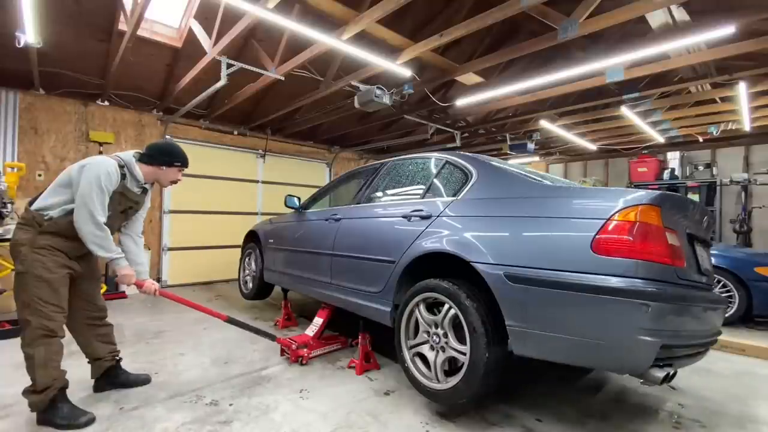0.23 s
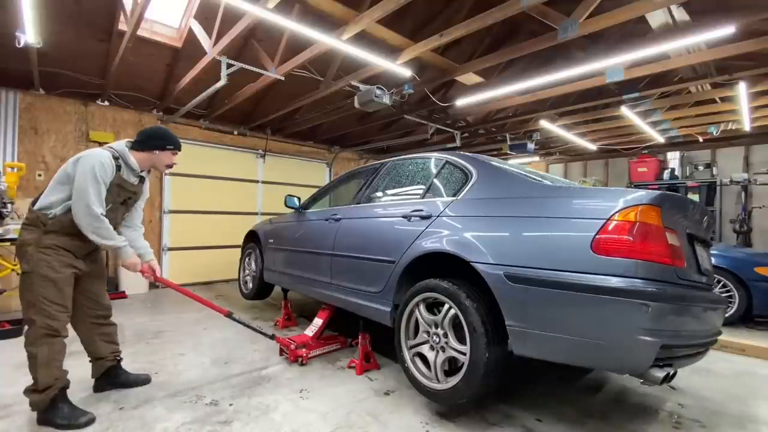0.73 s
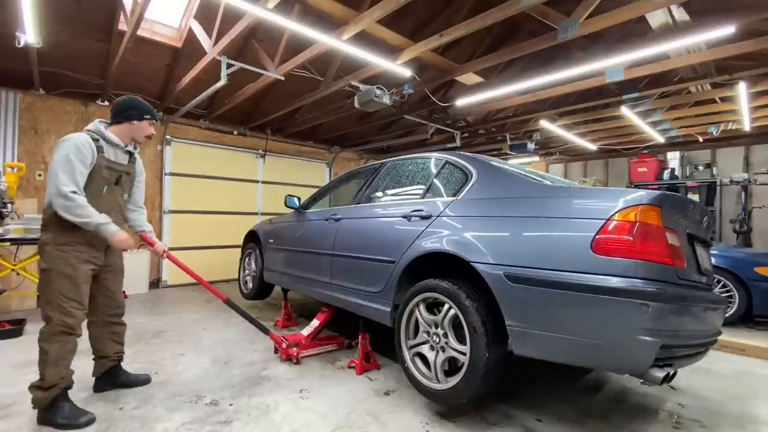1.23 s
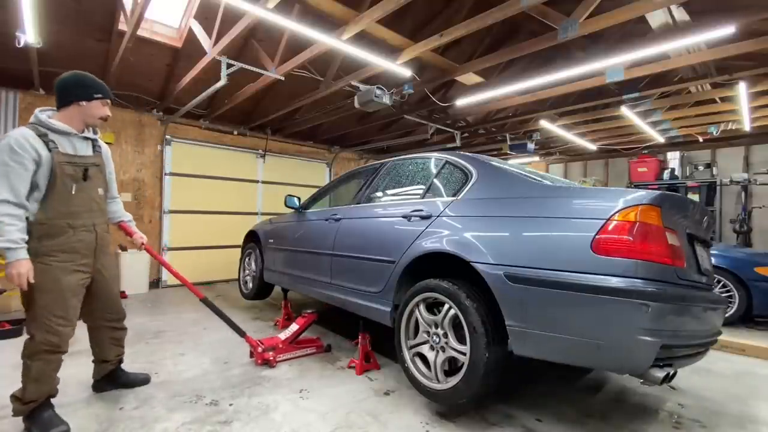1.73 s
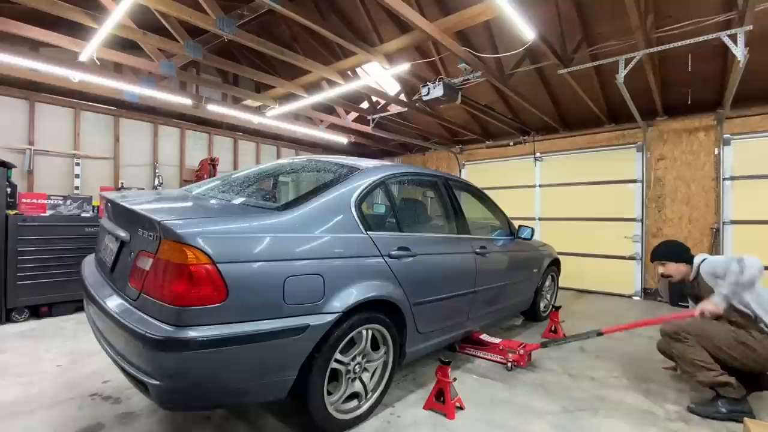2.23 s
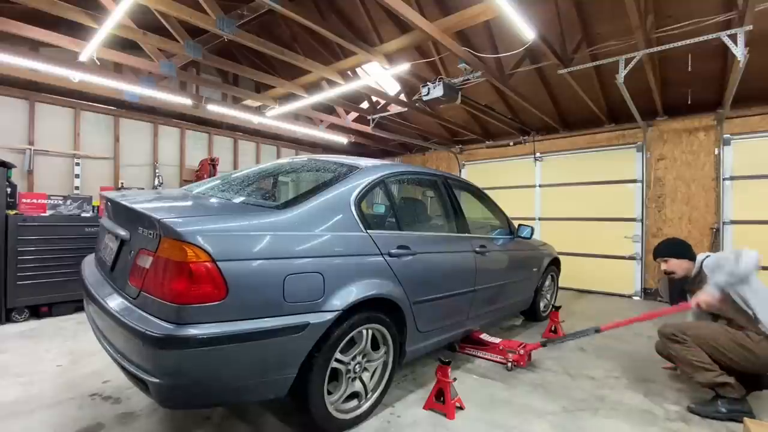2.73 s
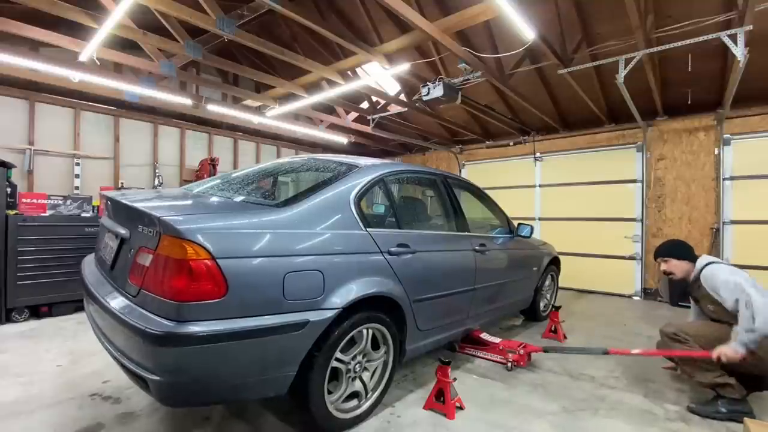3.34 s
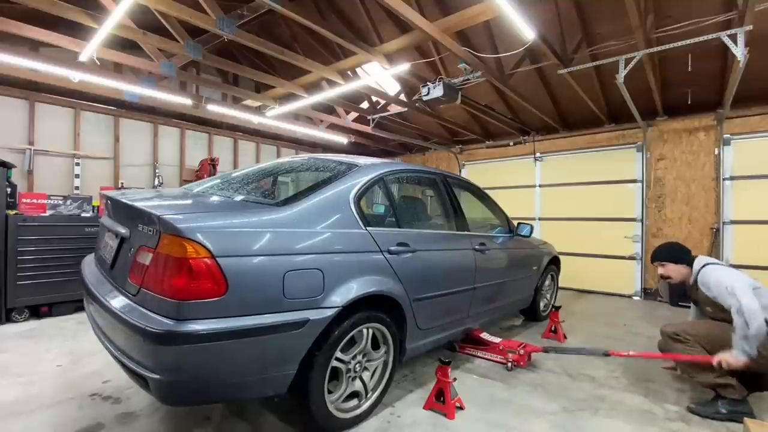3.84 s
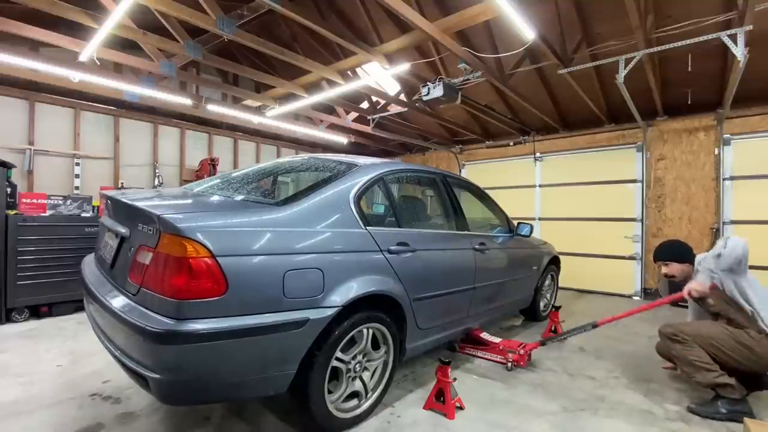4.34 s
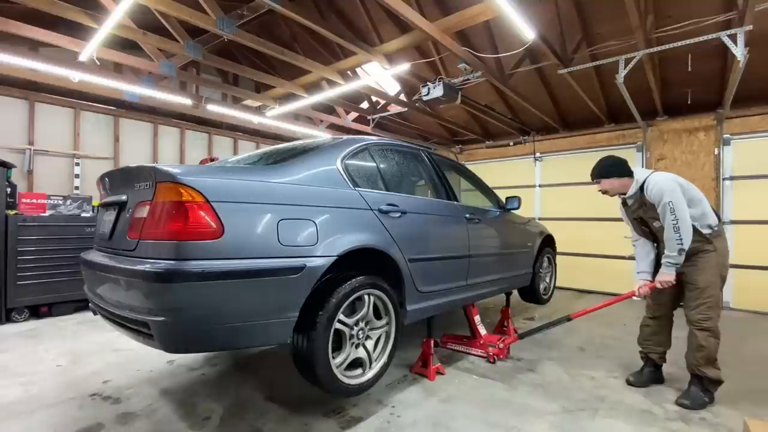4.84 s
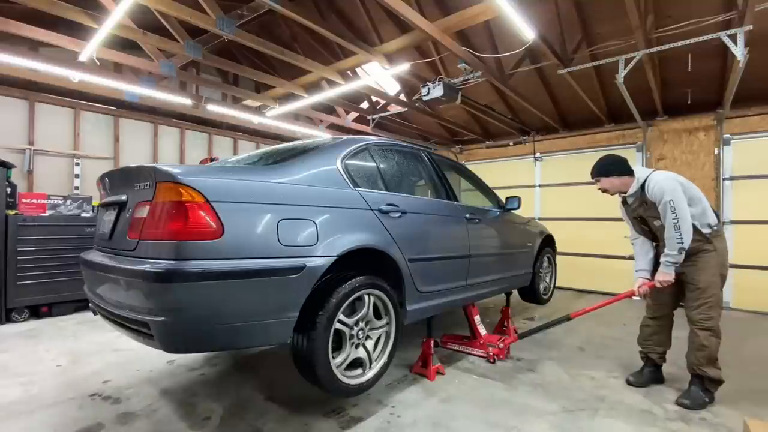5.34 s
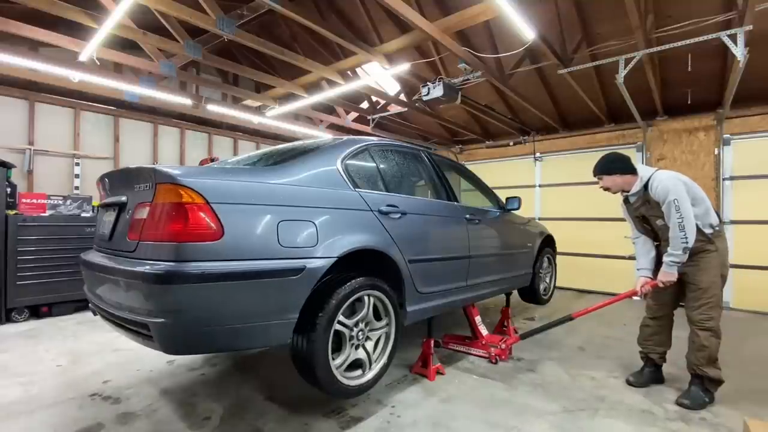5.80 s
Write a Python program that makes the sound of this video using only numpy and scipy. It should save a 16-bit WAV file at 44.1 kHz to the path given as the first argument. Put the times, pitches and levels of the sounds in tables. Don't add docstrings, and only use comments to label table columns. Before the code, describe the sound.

In a home garage a floor jack rumbles and squeals over concrete, its handle is pumped with hard metal clacks, then a steel stand clanks down.

```python
import sys
import numpy as np
from scipy import signal
from scipy.fft import rfft, irfft, next_fast_len
from scipy.io import wavfile
from scipy.ndimage import uniform_filter1d, map_coordinates

SR = 44100
rng = np.random.default_rng(int(sys.argv[2]) if len(sys.argv) > 2 else 0)


def ratio_of_db(decibels):
    return 10 ** (np.asarray(decibels, float) / 20)


def wav_record(signal):
    frames = np.transpose(np.atleast_2d(signal))
    bounded = np.clip(frames, -1, 1)
    quanta = np.round(bounded * 32767).astype(np.int16)
    wavfile.write(sys.argv[1], SR, quanta)


N = 267461
SPAN = 22000

TAKES = [
    2.25,
    4.775,
]

# (frequency [Hz], level [dB])
RUMBLE = [(12, -30), (20, 4.5), (136, 0.5), (177, -3), (242, -4), (331, -2.5), (366, -16), (400, -4),
          (520, -20), (880, -120)]
SHUFFLE = [(88, -49), (150, -9.5), (404, -5), (446, -2), (493, -4.5), (642, -4.5), (3000, -19.5),
           (3900, -46), (6600, -120)]
RUSTLE = [(900, -29), (1600, -11), (2800, 3.5), (4000, -0.5), (6500, 1.5), (8000, -5), (12000, -52),
          (16000, -24)]
HISS = [(300, -5), (1000, 8), (4000, -8), (8000, 4.5), (14500, 7), (15800, -3), (16500, -32)]
# (rumble [dB], shuffle [dB], rustle [dB])
FLOORS = [
    (-67, -67, -74),
    (-67.5, -66, -71.5),
    (-72, -72, -76.5),
]
# (time [s], level [dB])
BUSTLE = [(0, -1), (.6, 1), (1.0, 3), (1.25, 2), (1.5, 7), (2.0, 4), (2.25, 2), (2.45, -3), (2.9, 3),
          (3.05, -2), (3.25, 2), (3.7, -2.5), (3.92, 0.5), (4.35, 1.5), (4.75, -0.5), (5.3, -1), (5.6, 3),
          (6.06, 2)]
# (time [s], level [dB])
PANEL_DRONE = [(0.0, -70), (.03, -66), (.3, -68), (.36, -75), (.8, -75), (1.0, -74), (1.1, -90)]
FAN = [(102, -71), (167, -73), (334, -76)]
# (frequency [Hz], time to fall 60 dB [s])
GARAGE = [(60, 1), (300, 0.54), (1000, 0.64), (3000, 0.67), (6000, 0.49), (12000, 0.3)]

# (time [s], length [s], frequency [Hz], level [dB], glide [Hz/s])
SQUEAKS = [
    (0, 0.023, 6800, -68, 0),
    (1.05, 0.14, 6080, -75, -1),
    (1.233, 0.039, 5530, -66, 0),
    (4.925, .05, 1040, -73, -4000),
    (4.95, .028, 1770, -71, -6000),
]
# (time [s], lower line [dB], upper line [dB])
GRABS = [(1.495, -58, -80), (1.64, -67, -67), (1.676, -62, -55), (1.766, -59, -61), (1.912, -55, -62),
         (1.972, -53, -55), (2.03, -75, -67), (2.138, -83, -66), (2.205, -75, -71), (2.232, -63, -59)]
# (time [s], level [dB])
PUSH = [(1.0, -83), (1.04, -63), (1.12, -60.5), (1.41, -66.5), (1.56, -57.5), (1.77, -51.5), (1.99, -49),
        (2.2, -50), (2.25, -51.5)]
# (frequency [Hz], level [dB])
CHASSIS = [(71, -47), (120, -33), (238, 5), (330, -2), (491, 2.5), (1480, 0.5), (1840, -19), (4290, -20.5),
           (4870, -34), (6270, -11), (9000, -39), (11700, -72), (19800, -120)]
# (frequency [Hz], width [Hz], level [dB])
RATTLE = [(464, 18, 5), (878, 33, 15), (1897, 78, -0.5), (2350, 10, 8.5), (3020, 81, -17), (3267, 67, 3.5)]
# (time [s], peak [dB], frequency [Hz],
# brightness [dB], time to fall 60 dB [s])
BUMPS = [(1.4245, -37, 1560, -9.5, 0.053), (1.591, -43, 1870, -31, 0.17), (1.678, -40.5, 1290, -10, 0.1),
         (1.7267, -45, 1400, -6, .04), (1.743, -40.5, 1595, -2, 0.042), (1.856, -30.5, 1896, 3.5, 0.082),
         (1.966, -34.5, 1780, -8, 0.12), (2.0016, -35.5, 2260, -7, .07), (2.136, -42, 1500, -2, .03),
         (2.144, -33, 1288, -9, 0.067), (2.238, -35.5, 1820, -11, 0.061), (5.024, -64, 1300, -6, 0.11)]

# (time [s], peak [dB], low mode [Hz], high mode
# [Hz], high mode level [dB])
TICKS = [(0.323, -58, 1470, 2820, 5), (1.239, -48, 1010, 5590, -6), (1.268, -50, 1140, 3240, -6),
         (2.5068, -45, 1500, 4020, -12), (2.5367, -49, 1370, 2560, -3), (2.567, -49, 1400, 2700, -15),
         (2.6076, -44.5, 1370, 4800, -19), (2.6266, -46, 1210, 2630, -26), (2.683, -43.5, 1350, 2740, -2),
         (2.7762, -52, 2740, 4460, -4), (3.0955, -39, 2120, 2530, -8), (3.2315, -47.5, 1670, 3950, 5),
         (3.32, -52, 950, 1500, -6), (3.3454, -47, 1370, 2490, -20), (3.364, -42.5, 1210, 2930, -9.5),
         (3.5235, -51, 1020, 3350, 11), (3.9556, -48.5, 1370, 2590, -1), (4.045, -57, 1070, 4220, -21),
         (4.0752, -44.5, 1330, 4770, -11), (4.0922, -48, 1500, 2930, -1), (4.1172, -51, 1170, 4500, -16),
         (4.203, -57, 3020, 6350, 1), (4.972, -64, 1400, 2300, -3)]
# (time [s], peak [dB])
CLINK = [
    (0.689, -34),
]
# (frequency [Hz], level [dB], time to fall 60 dB [s])
PIN = [(528, -7, .16), (1087, -10, .08), (1400, -10, .06), (1873, -4, .17), (3103, -1, .2), (3091, -3, .22),
       (3550, -12, .04), (4204, -9, .08), (6340, -15, .2), (6380, -12, .18)]

# (time [s], level [dB])
LEFTOVER = [
    (2.25, -33.5),
]
# (frequency [Hz], level [dB])
ARM = [(88, -50), (150, -46), (319, -3), (419, -22), (571, -1.5), (1540, 3.5), (1990, 3), (2370, -3),
       (2580, -8.5), (3630, -10.5), (9000, -32), (11700, -67), (19800, -120)]
# (frequency [Hz], width [Hz], level [dB])
RIBS = [(341, 70, 11.5), (762, 124, 7), (990, 420, -3.5), (1288, 103, 6), (2026, 230, -3), (2450, 62, -7.5),
        (2580, 110, 12), (3110, 460, 4.5)]
# (frequency [Hz], level [dB], time to fall 60 dB [s])
BEAM = [(318, -4, .6), (1395, -3, .4), (1965, -2, .5), (2555, -4, .6)]
# (time [s], peak [dB])
STOP = [
    (2.4808, -21),
]
# (frequency [Hz], level [dB], time to fall 60 dB [s])
LEVER = [(950, -1, .02), (1150, -1, .018), (1340, -1, .018), (1530, 0, .022), (2560, -16, .03),
         (2870, -11, .025)]
# (frequency [Hz], level [dB])
SHAFT = [(250, -18), (700, 0), (1500, -3), (1750, -19), (2200, -22), (2600, -6), (3000, -12), (3500, -25),
         (8000, -29.5), (12000, -49)]
# (time [s], peak [dB], frequency [Hz], edge level [dB])
KNOCKS = [
    (2.585, -49.5, 276, 0),
    (2.944, -44, 292, 3.5),
    (3.223, -57, 365, -18),
    (3.316, -48.5, 269, 6.5),
    (3.693, -45.5, 283.6, 6),
    (4.043, -49.5, 276.6, 11),
    (4.411, -46, 275, 6),
]
# (time [s], peak [dB], top of the thud [Hz])
STEPS = [
    (2.655, -52, 200),
    (3.252, -56, 200),
    (3.952, -55, 310),
    (5.462, -52, 190),
    (5.558, -49, 490),
]
# (time [s], peak [dB], frequency [Hz], time to fall 60 dB [s])
SCUFFS = [(2.8, -61, 1800, .3), (3.165, -53, 360, .1), (3.225, -52.5, 220, 0.061), (3.44, -55, 330, .2),
          (4.105, -50.5, 318, .15), (4.22, -62, 6650, .04), (4.38, -62, 3150, .12),
          (4.41, -65, 5300, 0.055), (5.03, -57, 2550, 0.23), (5.42, -70, 4300, 0.46)]
# (time [s], peak [dB], low mode [dB], arm [dB], brightness [dB])
CLACKS = [
    (2.974, -18.5, -15, -11, 2),
    (3.727, -17.5, -30, -9.5, 2.5),
    (4.446, -17.5, -15, -10, 4),
]
# (frequency [Hz], level [dB], time to fall 60 dB [s])
SOCKET = [(1370, 15.5, 0.0053), (1820, -7, 0.012), (2560, -6.5, 0.032), (2843, -10, 0.013),
          (4216, -31, 0.025), (5260, -20, 0.022), (6400, -34, 0.0137)]

# (time [s], peak [dB])
CLANK = [
    (5.732, -8.5),
]
# (frequency [Hz], level [dB])
BLOW = [(18, -45), (45, -30), (120, -27), (220, -17), (330, -13.5), (535, -14.5), (752, -6), (1370, -12),
        (1700, -22), (2640, -11.5), (4020, -15), (4580, -12.5), (5960, -12.5), (7600, -19), (8500, -33),
        (9800, -38.5), (15700, -34.5)]
# (frequency [Hz], level [dB], time to fall 60 dB [s])
LEGS = [(1018, 0, .45), (1297, -11, .5), (2186, -4, .6), (2228, -9, .5), (2342, -9, .5), (2487, -5, .7),
        (2686, -3, .35), (2780, -5, .45), (2972, -9, .45), (3053, -7, .4), (3198, -9, .55), (3257, -7, .4),
        (3405, -6, .5), (3453, -4, .6)]
POST = [(3736, -12, .5), (4258, -9, .55), (4495, 4, .45), (4520, 2, .42), (4619, -11, .45),
        (5087, -11, .43), (5489, -13, .41), (5779, -1, .42), (5830, 3, .47), (5975, -11, .44),
        (6250, -13, .45), (6600, -12, .36), (6767, -8, .35), (7504, -6, .35)]
SLAB = [(518, 0, .1), (452, -2, .095), (570, -1, .06), (340, -12, .1), (269, -16, .08), (160, -20, .2),
        (70, -16, .22), (51, -23, .2)]
STAND = LEGS + POST


def unit(x):
    return x / np.sqrt(np.mean(x ** 2) + 1e-20)


def along(points, hz):
    f, v = np.transpose(points)
    return np.interp(np.log(hz + 1), np.log(f + 1), v)


def curves(rows):
    s, *cols = np.transpose(rows)
    return [ratio_of_db(np.interp(np.arange(N) / SR, s, c, -140, -140)) for c in cols]


def wobble(rate):
    return map_coordinates(rng.standard_normal(int(N * rate / SR) + 4), [np.arange(N) * rate / SR])


def filtered(x, response):
    m = next_fast_len(len(x) + 8192)
    return irfft(rfft(x, m) * response(np.fft.rfftfreq(m, 1 / SR)), m)[:len(x)]


def resonances(peaks):
    def response(f):
        total = 0
        for k, (center, width, db) in enumerate(peaks):
            damping = 1j * f * width
            total = total + (-1) ** k * ratio_of_db(db) * damping / (center * center - f * f + damping)
        return total
    return response


def rush(spectrum, patchy_db):
    z = signal.stft(rng.standard_normal(N + 512), nperseg=512)[2]
    field = uniform_filter1d(rng.standard_normal(z.shape), size=6, axis=0)
    field = uniform_filter1d(field, size=12, axis=1)
    x = signal.istft(z * ratio_of_db(patchy_db * unit(field)), nperseg=512)[1][:N]
    return unit(filtered(x, lambda hz: ratio_of_db(along(spectrum, hz))))


def ring(modes, rise, rough):
    t = np.arange(SPAN) / SR
    hz, db, t60 = np.transpose(modes)[..., None]
    drift = 0
    if rough:
        drift = rough * np.cumsum(rng.standard_normal((len(modes), SPAN)), axis=1) / np.sqrt(SR)
    spread = rng.normal(0, 1.5, hz.shape)
    tones = ratio_of_db(db + spread - 60 * t / t60) * np.sin(2 * np.pi * hz * t + drift)
    x = tones.sum(0) * (1 - np.exp(-t / rise))
    return x / np.abs(x).max()


def crack(t60, spectrum, peaks=None, rise=0.00074):
    t = np.arange(SPAN) / SR
    noise = rng.standard_normal(SPAN)
    if peaks:
        noise = noise + 1.65 * filtered(noise, resonances(peaks))
    coloured = filtered(noise, lambda hz: ratio_of_db(along(spectrum, hz)))
    x = coloured * ratio_of_db(-60 * t / t60) * (1 - np.exp(-t / rise))
    return x / np.abs(x).max()


def chatter(x, gaps):
    return x + sum(gain * np.roll(x, round(s * SR)) for s, gain in gaps)


def whistle(hz, rough):
    steps = 2 * np.pi * hz / SR + rough * rng.standard_normal(N) / np.sqrt(SR)
    return np.sqrt(2) * np.sin(np.cumsum(steps))


def arch(t, s, length):
    return np.abs(np.sin(np.pi * np.clip((t - s) / length, 0, 1)))


def add(track, s, db, sound, echo_db):
    hz, t, z = signal.stft(rng.standard_normal(SPAN), SR, nperseg=256)
    fade = ratio_of_db(-60 * t / along(GARAGE, hz)[:, None])
    tail = signal.istft(z * fade, SR, nperseg=256)[1][:SPAN]
    tail = tail * (1 - np.exp(-np.arange(SPAN) / SR / 0.003))
    wet = signal.fftconvolve(sound, tail / np.linalg.norm(tail))[:SPAN]
    start = round(s * SR)
    stop = min([round(c * SR) for c in TAKES if c > s] + [N, start + SPAN])
    track[start:stop] += ratio_of_db(db) * (sound + ratio_of_db(echo_db) * wet)[:stop - start]


def garage():
    t = np.arange(N) / SR
    rumble_db, shuffle_db, rustle_db = np.transpose(FLOORS)[:, np.searchsorted(TAKES, t)]
    busy_db = np.interp(t, *np.transpose(BUSTLE))
    low = ratio_of_db(rumble_db + 0.22 * busy_db + 1.6 * wobble(10)) * rush(RUMBLE, patchy_db=1.5)
    mid = ratio_of_db(shuffle_db + busy_db + 1.1 * wobble(13)) * rush(SHUFFLE, patchy_db=1.2)
    high = ratio_of_db(rustle_db + busy_db + 1.0 * wobble(12)) * rush(RUSTLE, patchy_db=1.2)
    drone = curves(PANEL_DRONE)[0] * ratio_of_db(2 * wobble(20)) * whistle(722 + 9 * wobble(12), rough=8)
    fan = sum(ratio_of_db(db + 2.5 * wobble(5)) * whistle(hz, rough=3.5) for hz, db in FAN) * (t < TAKES[0])
    fan_swell = ratio_of_db(-68.5) * arch(t, 0.27, 0.44) * whistle(62, rough=3.6)
    hiss = ratio_of_db(-78) * rush(HISS, patchy_db=2.0)
    return low + mid + high + drone + fan + fan_swell + hiss


def castor():
    t = np.arange(N) / SR
    lines_db = [[-16], [-26]]
    steady = curves(PUSH)[0] * (t > 1.488) * ratio_of_db(lines_db)
    age = (t - np.transpose(GRABS)[0][:, None]).clip(0)
    flare = (1 - np.exp(-age / 0.0048)) * ratio_of_db(-60 * age / 0.14)
    bites = ratio_of_db(np.transpose(GRABS)[1:]) @ flare
    lower, upper = (steady + bites) * (t < TAKES[0])
    slip = ratio_of_db(3.5 * wobble(60) - 1.5)
    squeal = lower * whistle(6170 + 45 * wobble(20), rough=23)
    squeal = squeal + upper * whistle(13050 + 40 * wobble(15), rough=16)
    chirps = np.zeros(N)
    for s, length, hz, db, glide in SQUEAKS:
        chirps += ratio_of_db(db) * arch(t, s, length) * whistle(hz + glide * (t - s), rough=17.8)
    return slip * squeal + chirps


def pin_ticks():
    track = np.zeros(N)
    for s, db, low_hz, high_hz, high_db in TICKS:
        modes = ring([(low_hz, 0, .015), (high_hz, high_db, .012)], rise=0.0001, rough=0)
        click = .6 * crack(.018, [(400, -22), (low_hz, 0), (high_hz, high_db),
                                  (2 * high_hz, high_db - 10), (16000, high_db - 34)])
        add(track, s, db + .5, modes + click, echo_db=-10)
    return track


def pin_clink():
    track = np.zeros(N)
    for s, db in CLINK:
        click = 0.5 * crack(0.3, [(300, -8), (600, 4.5), (1500, 8.0), (4500, -5), (5500, -14),
                                  (8000, -21), (10000, -60)])
        swell = np.sqrt(arch(np.arange(SPAN) / SR, .105, .105))
        after = 0.07 * ring([(3085, 0, 3)], rise=0.01, rough=1.5) * swell
        add(track, s, db - 3, ring(PIN, rise=.0003, rough=1) + click + after, echo_db=-12)
    return track


def wheels():
    t = np.arange(N) / SR
    roll, = curves(PUSH)
    grains = rng.random(N) < 1500 / SR
    grit = grains * rng.standard_normal(N) * ratio_of_db(6.5 * rng.exponential(size=N).clip(0, 3))
    jolts = unit(grit) + 1.35 * rng.standard_normal(N)
    frame = unit(filtered(jolts, lambda hz: ratio_of_db(along(CHASSIS, hz))))
    body = unit(frame + 0.39 * unit(filtered(jolts, resonances(RATTLE)))) * ratio_of_db(1.0 * wobble(35.46))
    drum = ratio_of_db(-3 + 0.95 * wobble(19)) * rush(SHUFFLE, patchy_db=-2.0)
    fizz = rush([(5000, -24), (6300, -1), (6900, -5), (7800, -18), (11500, -16), (13000, -2),
                 (14500, 0), (15800, -2)], patchy_db=1.5)
    start_s, rise_s, hold_s = 1.39, 0.14, .35
    fall_db = 51 * (t - start_s - rise_s - hold_s).clip(0)
    haze = ((t - start_s) / rise_s).clip(0, 1) * ratio_of_db(-68 - fall_db) * (t < TAKES[0])
    return roll * (body + drum) + haze * fizz


def wheel_jolts():
    track = np.zeros(N)
    for s, db, hz, bright_db, t60 in BUMPS:
        colour = [(250, -16), (700, -2), (hz, 0), (3000, bright_db), (4400, bright_db - 5),
                  (5000, bright_db - 13), (6500, bright_db - 24), (16000, bright_db - 61)]
        jolt = crack(t60, colour, [(hz, 500, -4), (3050, 120, 0), (4300, 200, -4)])
        frame = 0.18 * ring([(hz, 0, .035), (0.69 * hz, -3, .035)], rise=0.0007, rough=19)
        add(track, s, db - 3, jolt + frame, echo_db=-1)
    return track


def dying_clack():
    track = np.zeros(N)
    for s, db in LEFTOVER:
        arm = crack(0.49, ARM, RIBS, rise=0.00077) + 0.26 * ring(BEAM, rise=0.0011, rough=8.8)
        add(track, s, db, arm, echo_db=-8.5)
    return track


def handle_stop():
    track = np.zeros(N)
    for s, db in STOP:
        blow = ring(LEVER, rise=.002, rough=0)
        add(track, s, db - 7.0, blow + 0.22 * crack(0.44, SHAFT, rise=0.0032), echo_db=-13.5)
    return track


def slack_knocks():
    track = np.zeros(N)
    for s, db, hz, edge_db in KNOCKS:
        thud = ring([(hz, 0, .15), (1.2 * hz, -6, .08)], rise=0.045, rough=22.8)
        colour = [(500, -11.0), (1200, -8), (1600, -18.0), (2200, -33), (5000, -42), (8000, -61)]
        edge = ratio_of_db(edge_db - 1.5) * crack(0.081, colour, rise=0.00066)
        add(track, s, db - 3, thud + edge, echo_db=-7)
    return track


def boots():
    track = np.zeros(N)
    for s, db, top_hz in STEPS:
        colour = [(25, -12), (60, 0), (top_hz, -6), (3 * top_hz, -30), (8000, -70)]
        add(track, s, db, crack(0.26, colour, rise=0.0034), echo_db=-4.5)
    return track


def scuffs():
    track = np.zeros(N)
    wide = 1.3
    for s, db, hz, t60 in SCUFFS:
        colour = [(hz / wide ** 2, -50), (hz / wide, -14), (hz, 0), (hz * wide, -18), (hz * wide ** 2, -55)]
        add(track, s, db, crack(t60, colour, rise=0.0043), echo_db=-9)
    return track


def linkage_clacks():
    track = np.zeros(N)
    for s, db, low_db, arm_db, bright_db in CLACKS:
        socket = [(1040, low_db, 0.0041)]
        for hz, level, t60 in SOCKET:
            socket.append((hz, level + bright_db * np.log2(hz / 1400), t60))
        blow = chatter(ring(socket, rise=0.0028, rough=0), [(.0022, 1.2), (.0044, 1.09)])
        snap = crack(.02, [(2500, -14), (5300, 0), (7200, -4), (8500, -24), (11500, -24),
                           (13500, -19), (16000, -19)])
        snap = ratio_of_db(-13) * np.roll(snap, round(.002 * SR))
        arm = crack(0.59, ARM, RIBS, rise=0.002) + 0.26 * ring(BEAM, rise=0.0031, rough=13.5)
        add(track, s, db - 6.0, blow + snap + ratio_of_db(arm_db + 3.5) * arm, echo_db=-21)
    return track


def stand():
    track = np.zeros(N)
    swell = 1 - np.exp(-(np.arange(SPAN) / SR / .003) ** 2)
    for s, db in CLANK:
        blow = swell * (1.67 * crack(0.052, BLOW) + 0.17 * crack(0.5, BLOW))
        damped = [(hz, level, 0.08 * t60) for hz, level, t60 in STAND]
        legs = 1.08 * swell * ring(damped, rise=0.00093, rough=0)
        free = 0.15 * ring(STAND, rise=0.006, rough=4)
        knock = 0.7 * swell * ring(SLAB, rise=0.002, rough=3.7)
        landing = chatter(blow + legs + knock, [(.0195, ratio_of_db(-10))])
        add(track, s - .0045, db - 24, crack(.03, BLOW), echo_db=-6)
        add(track, s - .0015, db - 1.5, landing + free, echo_db=-5.0)
    return track


def scene():
    rolling = castor() + wheels() + wheel_jolts()
    small_parts = pin_ticks() + pin_clink()
    pumping = dying_clack() + handle_stop() + slack_knocks() + linkage_clacks()
    return (garage() + rolling + small_parts + pumping + boots() + scuffs() + stand())[None]


def band_limit(x):
    return signal.sosfilt(signal.butter(12, 16460, fs=SR, output="sos"), x)


def record(dry):
    mix = filtered(dry[0], lambda hz: hz < 15900)[None]
    return band_limit(mix)


dry = scene()
out = record(dry)
wav_record(out)
```